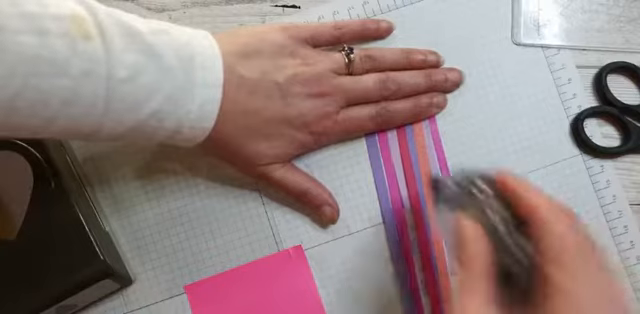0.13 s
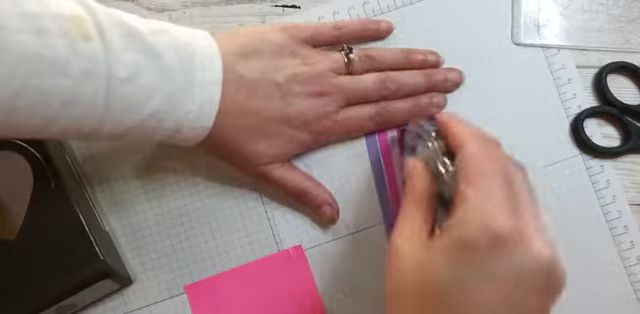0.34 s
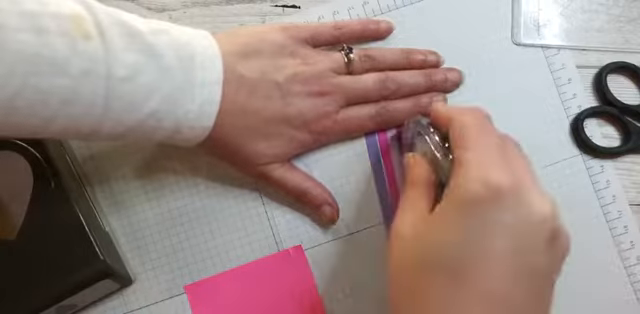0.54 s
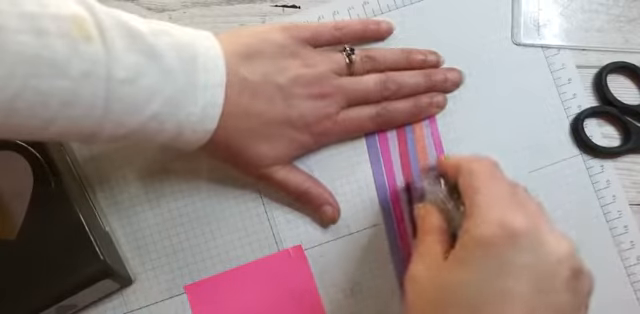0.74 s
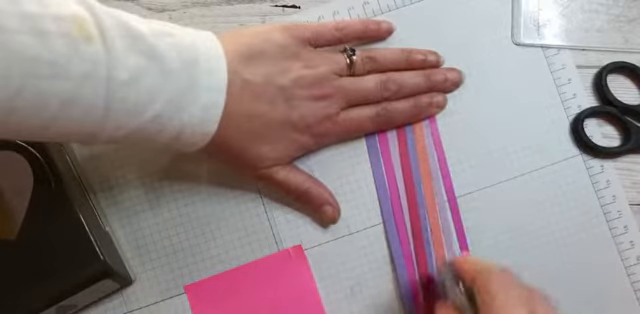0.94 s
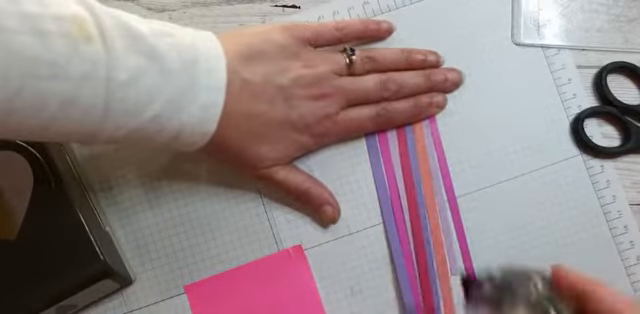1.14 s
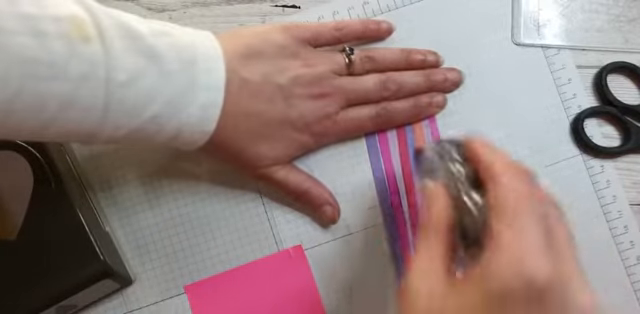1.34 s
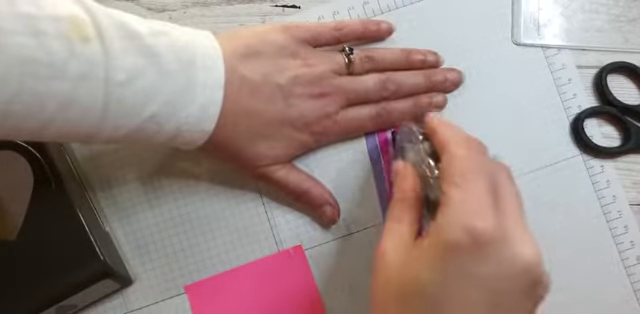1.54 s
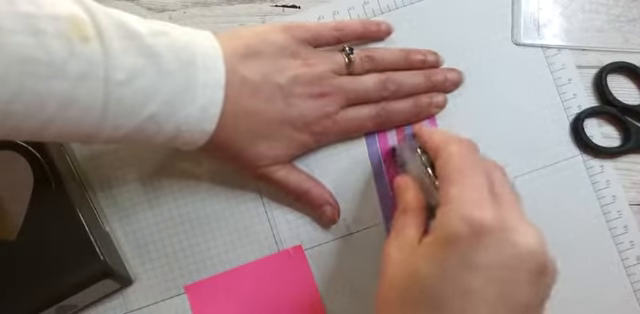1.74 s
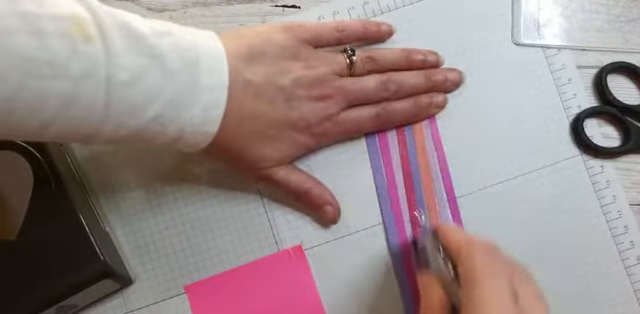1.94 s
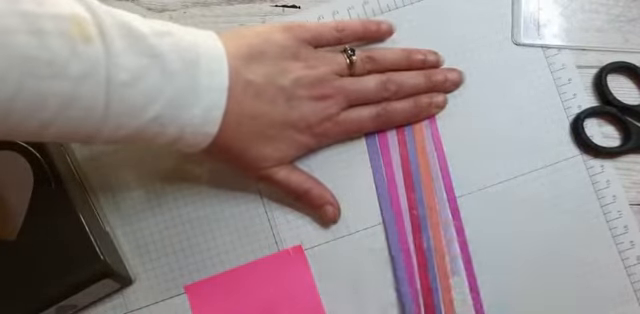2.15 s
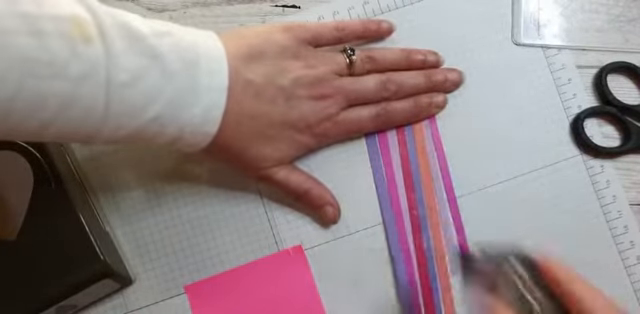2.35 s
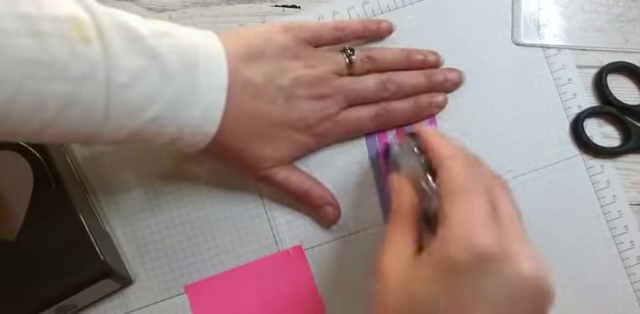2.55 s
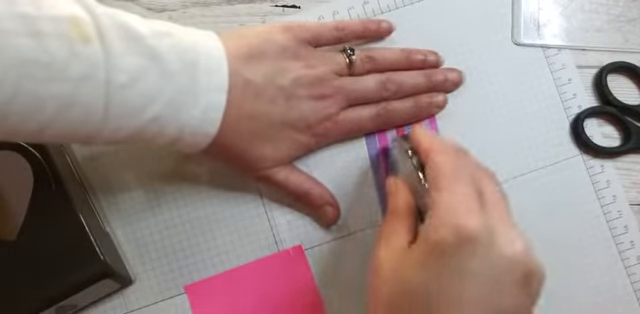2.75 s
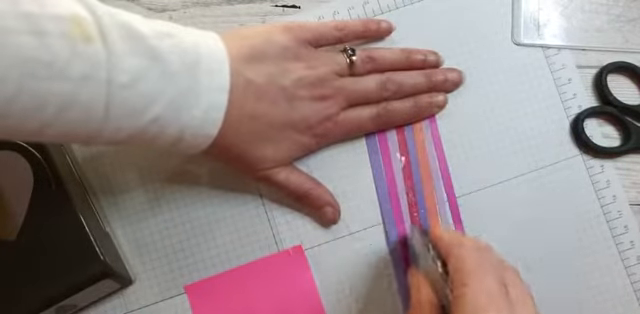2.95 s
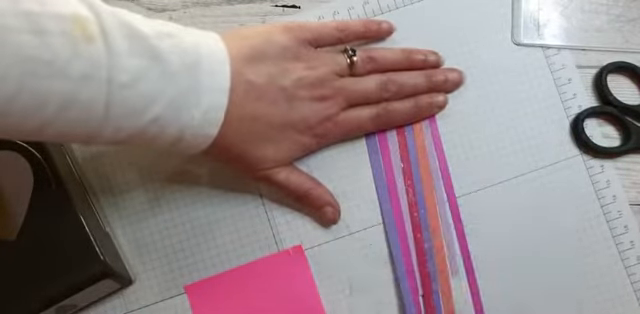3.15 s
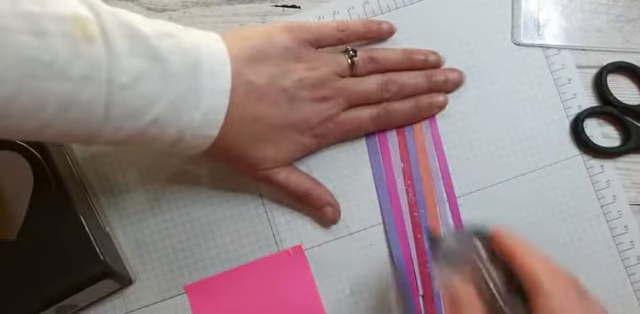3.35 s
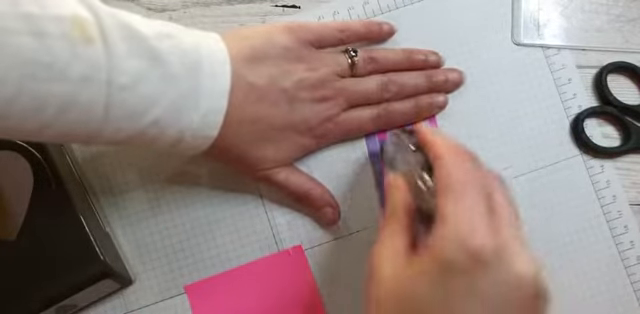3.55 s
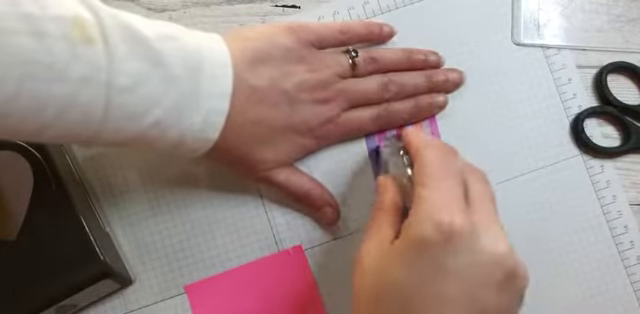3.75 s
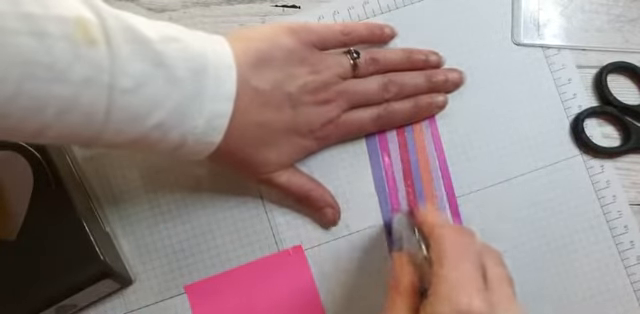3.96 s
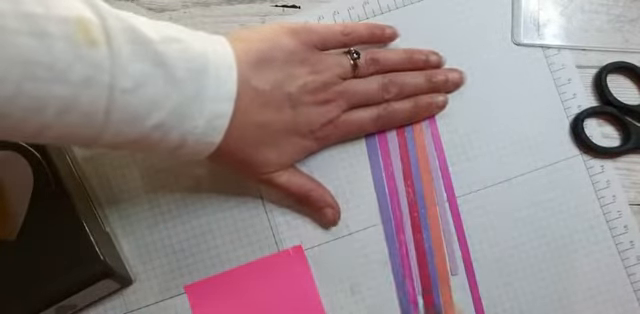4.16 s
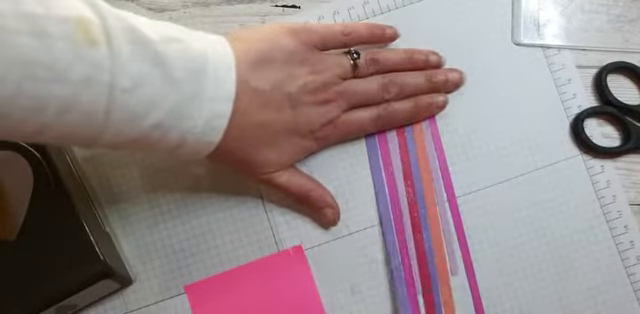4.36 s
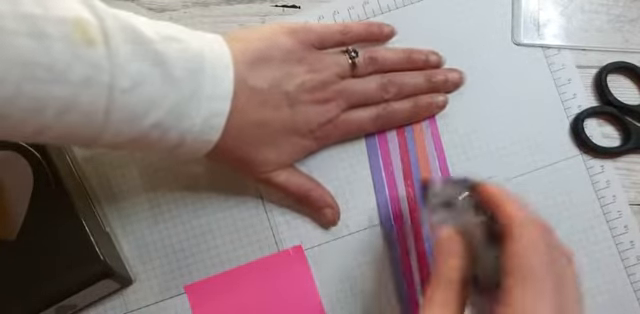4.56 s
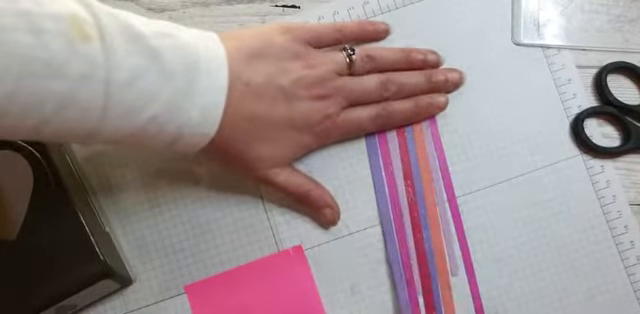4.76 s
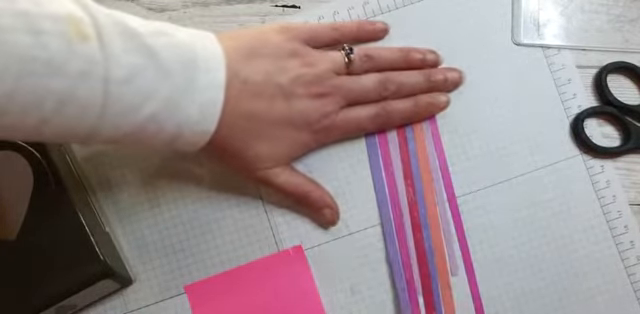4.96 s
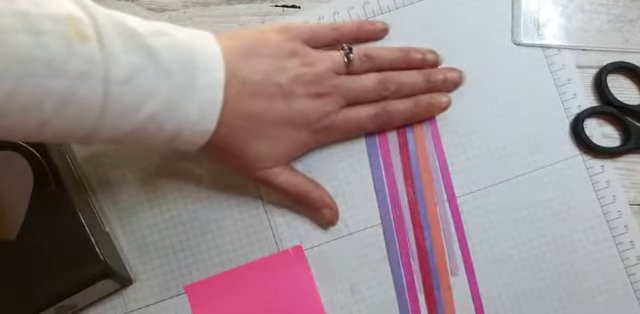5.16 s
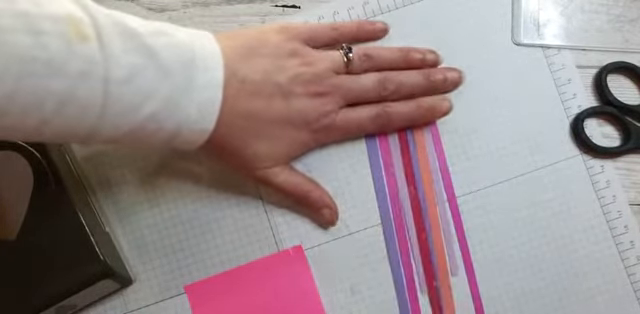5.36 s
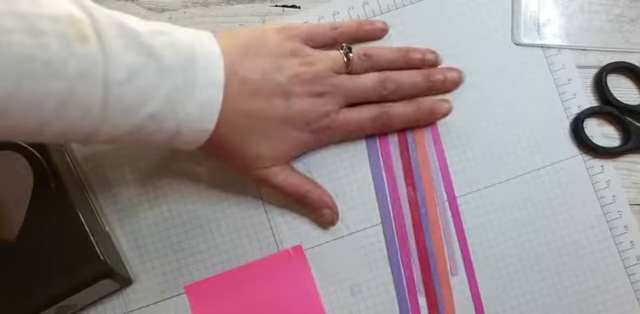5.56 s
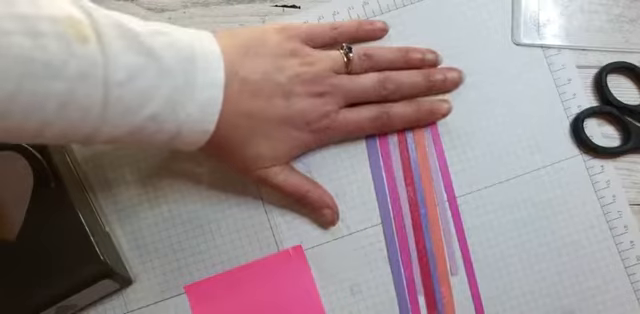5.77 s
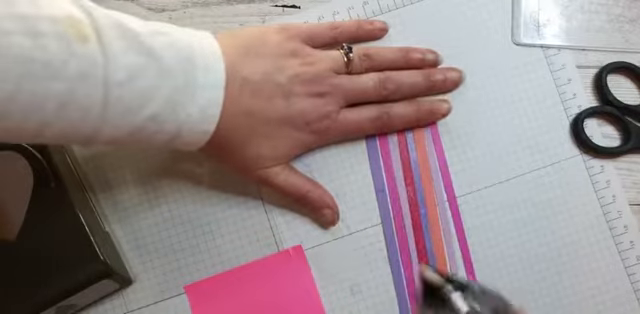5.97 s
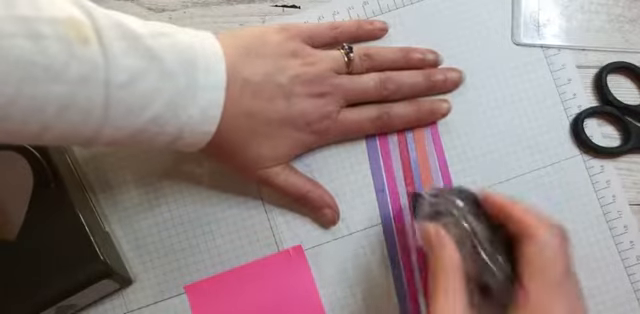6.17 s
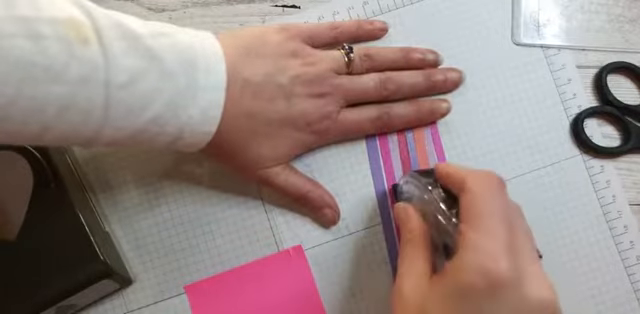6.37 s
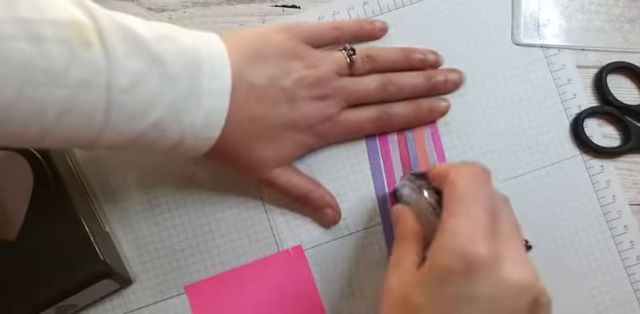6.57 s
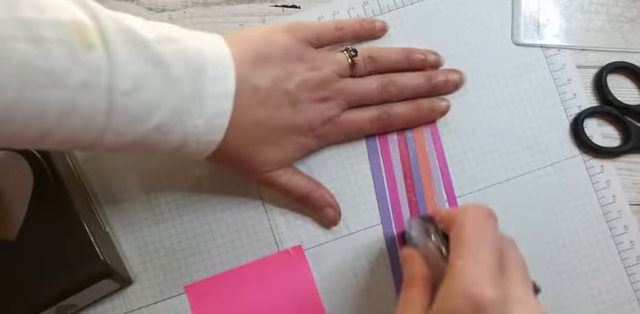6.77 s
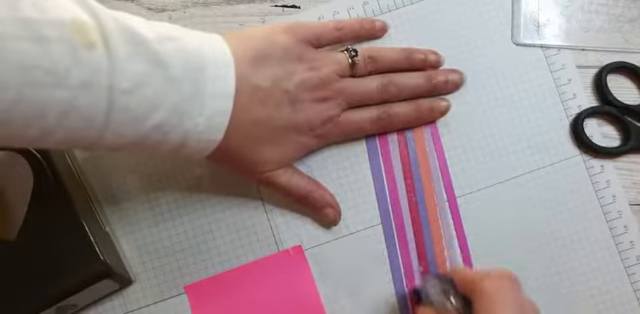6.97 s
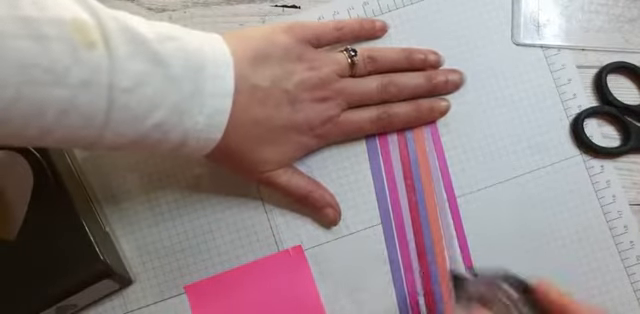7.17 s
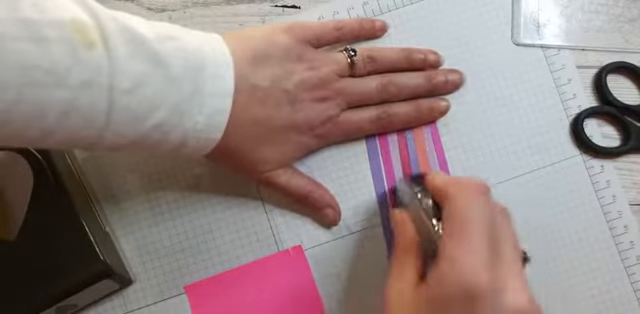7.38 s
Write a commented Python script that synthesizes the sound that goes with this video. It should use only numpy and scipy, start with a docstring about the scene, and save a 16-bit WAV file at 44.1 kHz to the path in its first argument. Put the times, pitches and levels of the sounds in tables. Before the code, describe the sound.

Close stereo view of a craft table in a quiet, fairly live room with faint hum and hiss. A plastic tape runner clacks down and tears tape along paper strips in four brief, buzzing pulls, the first hesitant. It is then lifted with higher clicks and a soft sleeve drag, before more clicks and a last short pull.

```python
"""A quiet, fairly live room with faint hum and hiss; a stereo pair close above a craft table, left side nearer.
It opens on the fading room sound of a pull of a plastic tape runner; clicks and four pulls along paper strips,
the first hesitating, follow up to 4.3 s: tape tears off its spool in stick-slip bursts that rattle the casing
and rumble in the table. Then the runner is lifted and clicks higher in the hand while a sleeve drags, until 6.5 s;
more clicks and one more pull end the take. Filtered noise makes the sound; ringing modes, the landings."""
import sys
import numpy as np
from scipy import signal
from scipy.fft import rfft, irfft, next_fast_len
from scipy.io import wavfile
from scipy.ndimage import uniform_filter1d

SR = 44100
rng = np.random.default_rng(int(sys.argv[2]) if len(sys.argv) > 2 else 0)


def master_out(mix):
    """Clip the mix to full scale and print it as 16-bit PCM to the path in sys.argv[1]."""
    frames = np.transpose(np.atleast_2d(mix))
    ceiling = np.clip(frames, -1, 1)
    pcm = np.round(ceiling * 32767).astype(np.int16)
    wavfile.write(sys.argv[1], SR, pcm)


N = 328104
RUN_IN = round(.3 * SR)   # samples made ahead of the start, then cut off
M = N + RUN_IN
T = (np.arange(M) - RUN_IN) / SR
SIZE = next_fast_len(M + 8192)
HZ = np.maximum(np.fft.rfftfreq(SIZE, 1 / SR), 1)

# Levels in the tables are settings ahead of later fluctuation, shell, room and recorder.
# Room air spectrum: [f/Hz, relative level/dB per Hz]
AIR_SPECTRUM = [(15, -42), (25, -10.5), (102, -1), (238, -10.5), (338, -9), (387, -23), (468, -15),
                (784, -25), (1390, -26.5), (1720, -19.5), (2320, -21.5), (5240, -24.5), (9770, -29.5),
                (14700, -26.5), (16400, -45)]
AIR_DB = -69
# Likeness of the air on left and right: [f/Hz, likeness 0..1]
AIR_LIKENESS = [(60, 0.68), (300, 0.63), (700, 0.13), (2000, 0.23)]
# Wavering hum: [f/Hz, width/Hz, level/dB]
HUM = [(98.7, 9.1, -73), (338, 3.5, -80.5)]
# Room tail: [f/Hz, t60/s, level/dB]
ROOM_TAIL = [(199, 0.43, 1.5), (540, 0.59, 2.5), (1390, 0.5, 0), (3680, 0.47, 0), (6950, 0.46, -2),
             (13000, 0.36, -4)]
NEAR_DB, NEAR_T60_S, ROOM_DB = -17, .06, -17.5

# Sleeve dragging over the table top: [start t/s, length/s, level/dB]
SLEEVE_DRAGS = [(4.3, .55, -75), (4.9, .17, -68), (5.2, .3, -68), (5.98, .6, -69)]
# Sleeve friction spectrum: [f/Hz, relative level/dB per Hz]
SLEEVE_SPECTRUM = [(88, -71), (150, -7), (226, -0.5), (372, 4.5), (707, -9), (886, -19), (1100, -14),
                   (1430, -32), (2420, -120)]
SLEEVE_EDGE_S = .08

# Runner landing on the table, its weight stirring the top: [t/s, push level/dB, rumble level/dB]
LANDINGS = [(0.523, -42.5, -64), (0.549, -43, -64), (1.73, -39.5, -59), (2.737, -47, -58),
            (3.756, -48, -70), (4.957, -59, -70), (6.53, -60, -80), (6.817, -52.5, -65)]
# Table-top modes: [f/Hz, relative level/dB, t60/s]
TABLE_MODES = [(70.1, -3.5, 0.11), (100.3, -0.5, 0.16), (153, -3, 0.096), (208, -2, 0.073), (268, -5, 0.08),
               (339, -7.5, 0.054), (478, -14.5, .05), (678, -12.5, .04)]
# Table rumble spectrum: [f/Hz, relative level/dB per Hz]
RUMBLE_SPECTRUM = [(18, -47.5), (30, -27), (102, -0.5), (178, -8), (257, -1), (310, -9.5), (411, -5.5),
                   (555, -12), (900, -14.5), (1170, -32), (1980, -120)]
RUMBLE_LAG_S, SETTLE_DB_PER_S = .04, 70   # slow take-up of the tearing; fade after a landing

# Tearing spectrum: [f/Hz, relative level/dB per Hz]
TEAR_SPECTRUM = [(410, -41.5), (700, -20), (851, -24.5), (1130, -10), (1310, -2.5), (1470, -2), (2530, -6),
                 (3000, -5), (3330, -5.5), (5240, -1.5), (5740, -4.5), (7440, -5.5), (9400, -17.5),
                 (13500, -7.5), (15600, -13)]
# Casing resonances: [f/Hz, width/Hz, lift/dB; negative lifts count as 0]
CASING_RESONANCES = [(1300, 150, 2.5), (1484, 92, 1.5), (1680, 170, 5), (1994, 130, 2.5), (2735, 170, 4),
                     (2980, 150, 4.5), (3750, 300, 1.5), (4320, 110, 5), (5190, 100, 5), (6770, 200, -12)]
SPREAD = 0.48   # power share of the crackle each side hears alone: the shell radiates from many spots

# Soft handling between pulls: [loudest t/s, level/dB, swell/s, fade/s, brightness/dB per octave]
RUSTLES = [(.545, -55, .02, .03, 0), (.685, -58, .04, .06, 1), (1.74, -56, .01, .1, -6),
           (1.855, -51, .04, .05, 1), (2.738, -49, .015, .06, -1), (2.872, -45, .035, .06, 0),
           (3.77, -50, .01, .05, -8), (3.89, -42, .04, .02, 1), (4.73, -55, .02, .05, 0),
           (4.8, -51, .08, .03, 1), (4.858, -51, .06, .015, 2), (4.97, -52, .03, .07, 0),
           (5.245, -63, .07, .07, 4), (5.37, -66, .015, .05, 7), (5.455, -70, .13, .1, 9),
           (5.612, -64, .03, .03, 9), (5.9, -60, .07, .1, 0), (6.078, -58, .08, .02, -1),
           (6.1, -55, .02, .1, -2), (6.18, -54, .01, .06, -3), (6.66, -72, .03, .1, -9),
           (6.722, -64, .03, .05, 1), (6.8, -49, .03, .06, 2), (6.89, -48, .05, .08, 3),
           (6.935, -42, .03, .02, -3)]
# Single slips and casing clicks: [t/s, level/dB, brightness/dB per octave]
SLIPS = [(.237, -55, 5), (.527, -43, -3.5), (.5506, -38, -.5), (.6605, -46, -6.5), (.6945, -26, -6.5),
         (.7405, -27, 2), (.765, -30, 0), (.791, -26, 2), (.81, -21, -1), (.828, -29, 0), (.8586, -24, 0),
         (.875, -24, 0), (1.024, -26, -4), (1.057, -25, -3), (1.091, -24, -5), (1.1193, -21, -2),
         (1.1278, -19, 0), (1.269, -49, 8), (1.73, -40, -1), (1.8108, -49, -8), (1.826, -27, -5.5),
         (2.0144, -27, 3), (2.083, -27, -2), (2.7407, -46, -5), (2.7565, -38, -8), (2.83, -50, -9),
         (2.8702, -32, -6.5), (3.205, -20.5, -3.5), (3.2477, -25, 4), (3.556, -60, 8), (3.761, -31, -6.5),
         (3.85, -43, -9), (3.875, -22, -.5), (3.922, -21, -2), (4.7267, -46, 4), (4.7497, -32, -6),
         (4.782, -35, 1), (4.793, -34, -6), (4.82, -33, -5), (4.828, -31, -4), (4.8463, -28, -2),
         (4.854, -33, 2), (4.9515, -24, -1), (4.969, -34, 1), (5.243, -52, 5), (5.607, -56, 9),
         (5.8887, -44, 0), (6.082, -31, 1.5), (6.116, -45, 1), (6.14, -43, 0), (6.1732, -34, -1.5),
         (6.237, -56, -8), (6.6274, -56, -10), (6.767, -23.5, 1), (6.774, -36, 1), (6.8205, -19.5, 1.5),
         (6.8289, -19, 1), (6.8345, -20, -1.5), (6.8648, -20.5, 0), (6.976, -22, -1), (7.0185, -19.5, 0),
         (7.0656, -24, -2), (7.1188, -26, 3), (7.1402, -28, 7), (7.246, -47, 3)]
# Side of the hand: [t/s, left minus right level/dB]
SIDE_OF_HAND = [(0, -2), (4.5, -1), (4.75, 3.5), (5, 3.5), (5.2, 1), (6, 1), (6.15, 4), (6.5, 0)]
SLIP_S, CRACK_DB = .005, 6   # time for a slip to fade 7.87 dB; crack over the slip level
SLIP_MIDDLE_DB, RUSTLE_MIDDLE_DB = 2.5, 4   # lift of the middle range
MIDDLE_PER_BRIGHTNESS = .6   # dull slips and rustles lose their middle range too
LIFTED_S = (4.4, 6.5)   # off the table the shell loses its lowest ring and sounds higher
LOST_RING, GAINED_RING = (1200, 500, .6), (1950, 600, .5)   # (f/Hz, width/Hz, share)

# Pulls, the first hesitating one in two rows: [grip t/s, midway t/s (a moment between grip and let-go
# where the tearing level is set), let-go t/s, tearing level/dB at each of these three moments,
# slip rate at grip/per s, slip rate at full speed/per s, rumble over tearing/dB,
# brightness at let-go/dB per octave]
PULLS = [(-.3, -.2, -.09, -20.5, -20.5, -26, 60, 85, -26, 0),
         (.739, .816, .852, -37, -34, -41, 70, 90, -19, .5),
         (.858, .93, 1.135, -25.5, -30, -29, 70, 90, -24, -2.2),
         (1.866, 2.004, 2.243, -33, -26.5, -29.5, 50, 85, -23, 1),
         (2.892, 2.986, 3.27, -31, -24.5, -28.5, 60, 90, -26, 1),
         (3.899, 3.95, 4.285, -30, -27.5, -26.5, 45, 100, -26, -.6),
         (6.938, 6.99, 7.138, -23.5, -30, -30, 80, 85, -28, -.5)]
SPEED_UP_S, RELEASE_DB_PER_S = .09, 900
GRIP_BRIGHTNESS_DB = .7   # per octave
SLIP_FADE_DB_PER_S = 420   # the dip between slips grows with their gap
UNEVEN_DB = 1.3   # spread of the slip rate

LEFT_LEAD_S = 5 / SR
TREBLE_EDGE_HZ, CUTOFF_HZ = 15600, 16500


def from_db(db):
    """Decibels to gain."""
    return 10 ** (np.asarray(db) / 20)


def rms_one(x):
    """Scaled to rms 1."""
    return x / np.sqrt(np.mean(x ** 2) + 1e-20)


def at_hz(points, hz):
    """A (Hz, value) table read on a log-frequency axis."""
    table_hz, values = np.transpose(points)
    return np.interp(np.log(np.maximum(hz, 1)), np.log(table_hz), values)


def causal(db_of_hz):
    """Minimum-phase frequency response with the given dB curve, scaled to unit power."""
    cepstrum = irfft(np.log(from_db(db_of_hz(np.arange(4097) * SR / 8192))))
    # folding the cepstrum forward in time makes the phase minimal
    cepstrum[1:4096] *= 2
    cepstrum[4097:] = 0
    response = irfft(np.exp(rfft(cepstrum)))
    return rfft(response / np.linalg.norm(response), SIZE)


def colour(x, spectrum):
    """Shaped by a (Hz, dB) table."""
    return irfft(rfft(x, SIZE) * causal(lambda hz: at_hz(spectrum, hz)), SIZE)[..., :M]


def drift(rate_hz):
    """Slow random wander of rms 1: noise through two equal low-pass poles."""
    r = np.exp(-2 * np.pi * rate_hz / SR)
    wander = signal.lfilter([1], [1, -2 * r, r * r], rng.standard_normal(M + SR))
    return rms_one(wander[SR:])


def resonate(x, hz, width_hz):
    """Two-pole resonance, gain about 1 on top."""
    r = np.exp(-np.pi * width_hz / SR)
    poles = [1, -2 * r * np.cos(2 * np.pi * hz / SR), r * r]
    return signal.lfilter([(1 - r * r) / 2, 0, (r * r - 1) / 2], poles, x)


def room_air():
    """Steady air and microphone hiss, most alike on both sides in the bass, with a wavering narrow-band hum."""
    mid, side = rng.standard_normal((2, M))
    alike = np.clip(at_hz(AIR_LIKENESS, np.fft.rfftfreq(M, 1 / SR)), 0, 1)
    mid = rfft(colour(mid, AIR_SPECTRUM)) * np.sqrt(1 + alike)
    side = rfft(colour(side, AIR_SPECTRUM)) * np.sqrt(1 - alike)
    air = from_db(AIR_DB) * irfft(np.array([mid + side, mid - side]), M) / np.sqrt(2)
    hum = 0
    for hz, width_hz, db in HUM:
        narrow = resonate(resonate(rng.standard_normal(M), hz, width_hz), hz, width_hz)
        hum = hum + from_db(db) * rms_one(narrow)
    return air + hum


def moving(x, responses, step):
    """The source wanders: overlapping pieces of it are dealt to different stereo responses in turn."""
    out, place, count = 0, np.arange(M) / step, len(responses)
    for k, response in enumerate(responses):
        away = abs((place - k + count / 2) % count - count / 2)
        piece = x * np.cos(np.pi / 2 * np.minimum(away, 1))
        out = out + signal.oaconvolve(piece[None], response, axes=1)[:, :M]
    return out


def space(x):
    """Per side: quick reflections from table and hands, then the room's tail dying band by band."""
    age = np.arange(SR * 2 // 3) / SR
    near = rng.standard_normal((5, 2, SR // 12)) * from_db(-60 * age[:SR // 12] / NEAR_T60_S)
    tail, white = 0, rng.standard_normal((3, 2, len(age)))
    edges = 150 * 2 ** np.arange(0, 8.)   # octave bands
    hz, t60, db = np.transpose(ROOM_TAIL)
    for low, high in zip(edges, edges[1:]):
        band = signal.sosfilt(signal.butter(2, [low, high], "band", fs=SR, output="sos"), white)
        white = white[..., ::-1]   # neighbouring bands get unrelated noise
        centre = np.log(low * high) / 2
        t60_s = np.interp(centre, np.log(hz), t60)
        band_db = np.interp(centre, np.log(hz), db)
        tail = tail + band * from_db(band_db - 60 * age / t60_s)
    tail = tail * (1 - np.exp(-age / 0.0033))
    close = from_db(NEAR_DB) * moving(x, near / np.linalg.norm(near[0, 0]), step=900)
    return close + from_db(ROOM_DB) * moving(x, tail / np.linalg.norm(tail[0, 0]), step=1500)


def sleeve():
    """Dull, smooth friction of cloth on the table: coloured noise with soft edges."""
    level = 0
    for start, length, db in SLEEVE_DRAGS:
        inside = np.minimum(T - start, start + length - T)
        level = level + from_db(db) * np.clip(inside / SLEEVE_EDGE_S + .5, 0, 1)
    return colour(level * rng.standard_normal(M), SLEEVE_SPECTRUM)


def landings():
    """A soft push of the runner sets the table modes ringing, each a decaying sine."""
    times, push_db, _ = np.transpose(LANDINGS)
    at = [round(t * SR) + RUN_IN for t in times]
    out = 0
    for hz, db, t60 in TABLE_MODES:
        push = np.full(M, 1e-18)
        push[at] = from_db(push_db + db - 9.0 + rng.normal(0, 2, len(at)))
        r, w = from_db(-60 / (t60 * SR)), 2 * np.pi * hz / SR
        out = out + signal.lfilter([0, np.sin(w)], [1, -2 * r * np.cos(w), r * r], push)
    return out


def table_rumble(tear_db, table_db):
    """Low noise in the table top, which takes up the tearing slowly and is stirred by each landing."""
    push = from_db(tear_db + table_db)
    for t, _, weight_db in LANDINGS:
        push += from_db(weight_db - SETTLE_DB_PER_S * (T - t)) * (T > t)
    r = np.exp(-1 / (RUMBLE_LAG_S * SR))
    lagging = signal.lfilter([1 - r], [1, -r], push)
    slow = np.minimum(lagging, uniform_filter1d(push, size=1800))
    return colour(from_db(1.86 * drift(25)) * slow * rng.standard_normal(M), RUMBLE_SPECTRUM)


def grains(spread_db):
    """Dense crackle of glue threads snapping, with uneven sizes; two sides."""
    sizes = from_db(spread_db * np.minimum(rng.exponential(1, (3, M)), 5))
    both, left, right = rng.standard_normal((3, M)) * sizes
    return rms_one(np.sqrt(1 - SPREAD) * both + np.sqrt(SPREAD) * np.array([left, right]))


def shell_db(hz):
    """Tearing spectrum lifted by the casing resonances."""
    lifts = (max(lift, 0) / (1 + (2 * (hz - f) / width) ** 2) for f, width, lift in CASING_RESONANCES)
    return at_hz(TEAR_SPECTRUM, hz) + sum(lifts)


def casing(force, tilt_db, middle_db):
    """Force heard through the shell; brightness and middle lift weigh its low, middle and high range."""
    shell = causal(shell_db)
    place, out = np.clip(np.log2(HZ / 4000) / 1.5, -1, 1), 0   # ranges 1.5 octaves apart
    for centre in (-1, 0, 1):
        gain = from_db(tilt_db * 1.5 * centre + middle_db * (centre == 0))
        out = out + rfft(force * gain, SIZE) * np.maximum(1 - abs(place - centre), 0)
    return irfft(out * shell, SIZE)[..., :M]


def handling():
    """Slips, each a crack and a short burst of crackle, over rustling fingers; also gives the side of the hand."""
    level, tilt, crack = np.zeros((3, M))
    for t, db, swell, fade, tilt_db in RUSTLES:
        # 20 dB up over the swell time, 20 dB down over the fade time
        rustle = from_db(db - 20 * np.maximum((t - T) / swell, (T - t) / fade))
        tilt[rustle > level] = tilt_db
        level = level + rustle
    middle = RUSTLE_MIDDLE_DB + MIDDLE_PER_BRIGHTNESS * tilt
    level = level * from_db(1.6 * drift(60))
    lifts = SLIP_MIDDLE_DB + 1.5 * rng.standard_normal((len(SLIPS), 1))
    for (t, db, tilt_db), lift in zip(SLIPS, lifts):
        i = round(t * SR) + RUN_IN
        age = np.arange(min(M - i, SR // 8)) / SR
        slip = from_db(db - 7.87 * (age / SLIP_S) ** 2) * (1 - np.exp(-age / .0025))
        louder = i + np.flatnonzero(slip > level[i:i + len(age)])
        tilt[louder], middle[louder] = tilt_db, lift + MIDDLE_PER_BRIGHTNESS * tilt_db
        level[i:i + len(age)] += slip
        crack[i + 40] = from_db(db + CRACK_DB)
    clicks = casing(level * grains(1.8) + crack, tilt, middle)
    lost, gained = (share * resonate(clicks, hz, width) for hz, width, share in (LOST_RING, GAINED_RING))
    lifted = (T > LIFTED_S[0]) * (T < LIFTED_S[1])
    return clicks + (gained - lost) * lifted, np.interp(T, *np.transpose(SIDE_OF_HAND))


def pull_motion():
    """Course of each pull: tearing level, dip depth, slip count, rumble level and brightness as the hand speeds up."""
    tear_db = np.full(M, -200.)
    depth_db, turns, table_db, tilt = np.zeros((4, M))
    wobble = from_db(UNEVEN_DB * drift(28.37))
    for k, (grip, midway, end, *levels, first_rate, top_rate, rumble_db, bright_db) in enumerate(PULLS):
        on = T >= grip
        held = np.interp(T[on], [grip, midway, end], levels)
        tear_db[on] = held - RELEASE_DB_PER_S * np.maximum(T[on] - end, 0)
        rate = top_rate - (top_rate - first_rate) * np.exp(-(T[on] - grip) / SPEED_UP_S)
        # whole turns number the slips, apart for each row
        turns[on] = 100 * k + np.minimum(.2 + np.cumsum(rate * wobble[on]) / SR, 99)
        depth_db[on], table_db[on] = SLIP_FADE_DB_PER_S / rate, rumble_db
        tilt[on] = np.interp(T[on], [grip, end], [GRIP_BRIGHTNESS_DB, bright_db])
    return tear_db, depth_db, turns, table_db, tilt


def tearing(tear_db, depth_db, turns, tilt):
    """Tape sticks, builds up, lets go and dies away; each burst has its own strength and colour."""
    strength, bright, middle = rng.standard_normal((4000, 3))[turns.astype(int)].T
    dip_db = depth_db * (2 * (turns % 1) - .7) ** 2
    burst = from_db(1.1 * strength - dip_db + 1.4 * drift(350))
    burst = burst / np.sqrt(uniform_filter1d(burst ** 2, size=3000))   # evens out the running level
    burst = uniform_filter1d(burst, size=60)
    brightness = tilt + .9 * bright + .5 * drift(8)
    middle_db = .9 * middle + .7 * drift(8) - 1.1
    return casing(from_db(tear_db) * burst * grains(2.82), brightness, middle_db)


def scene():
    """Runner close below the microphones, a little nearer the left one, which hears it earlier and louder."""
    tear_db, depth_db, turns, table_db, tilt = pull_motion()
    table = table_rumble(tear_db, table_db) + landings() + sleeve()
    clicks, pan_db = handling()
    tear = tearing(tear_db, depth_db, turns, tilt)
    left, right = tear + clicks * from_db([pan_db / 2, -pan_db / 2])
    late_right = np.interp(T - LEFT_LEAD_S, T, right)
    direct = np.array([left * from_db(0.2), late_right * from_db(-0.3)])
    return (direct + space(left + right + 0.61 * table) + table + room_air())[:, RUN_IN:]


def record(dry):
    """The highest treble drops to a faint shelf, then the top is cut steeply."""
    shelf = signal.sosfilt(signal.ellip(8, .5, 36, TREBLE_EDGE_HZ, fs=SR, output="sos"), dry)
    return signal.sosfilt(signal.ellip(10, .5, 60, CUTOFF_HZ, fs=SR, output="sos"), shelf)


dry = scene()
out = record(dry)
master_out(out)
```